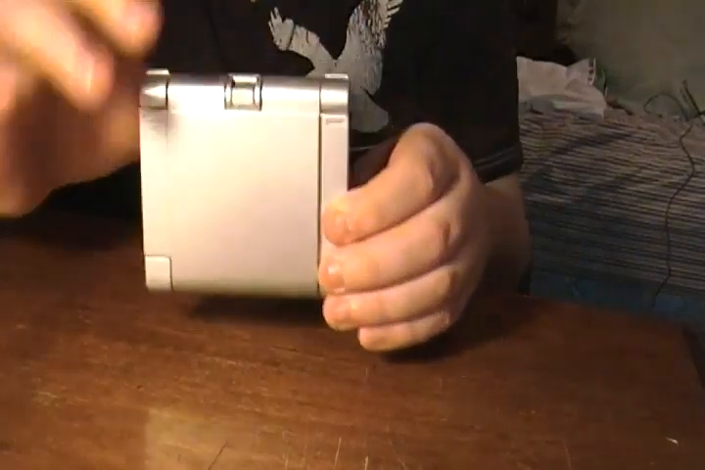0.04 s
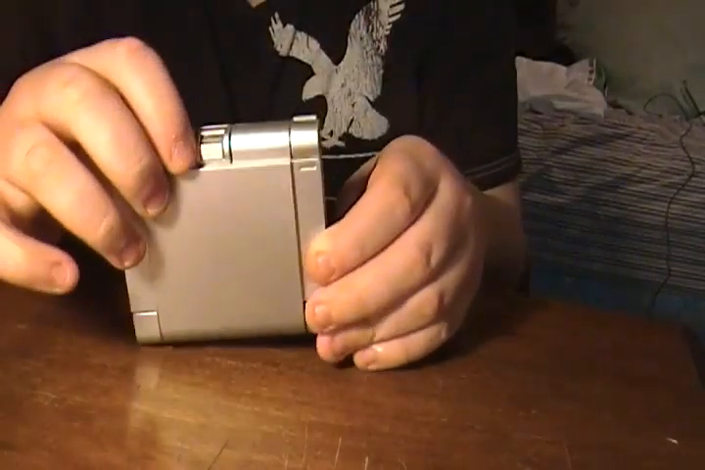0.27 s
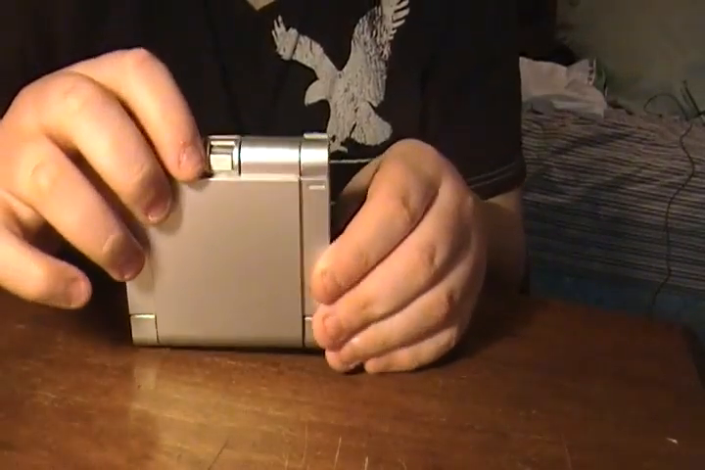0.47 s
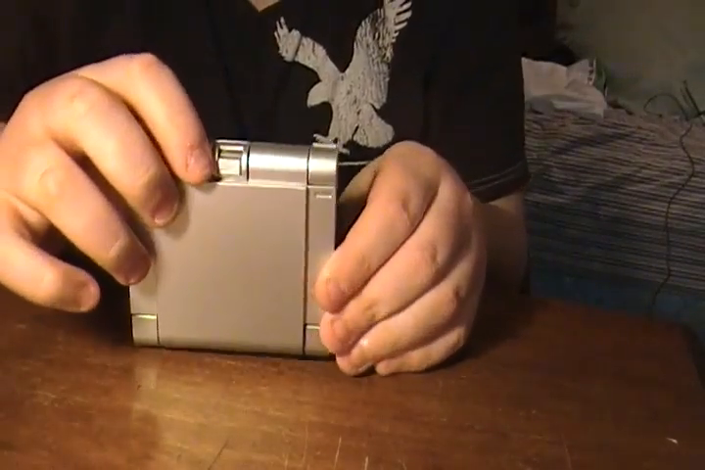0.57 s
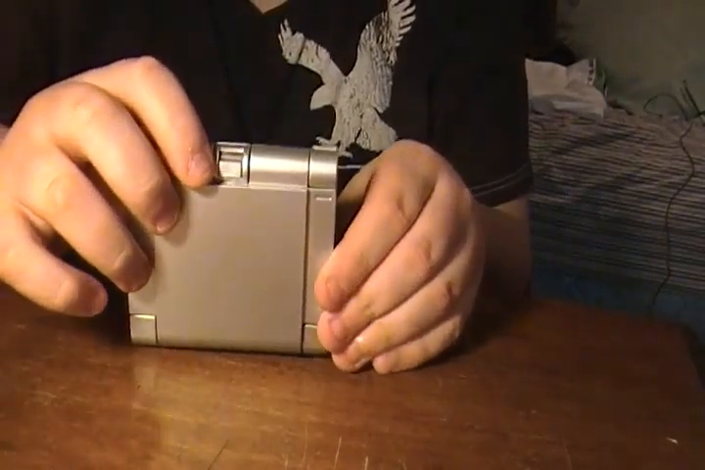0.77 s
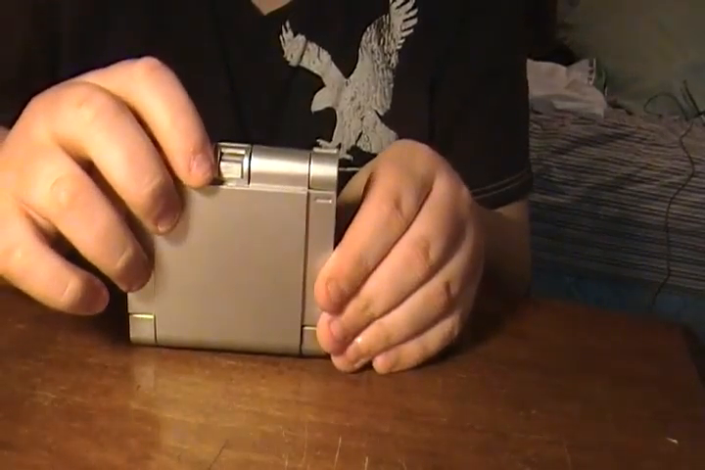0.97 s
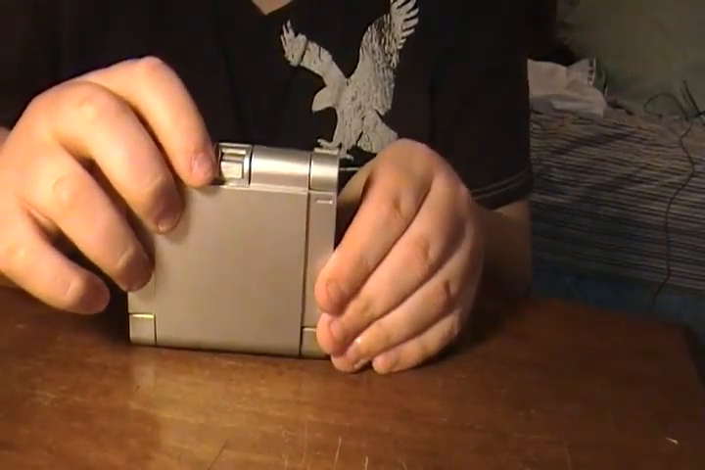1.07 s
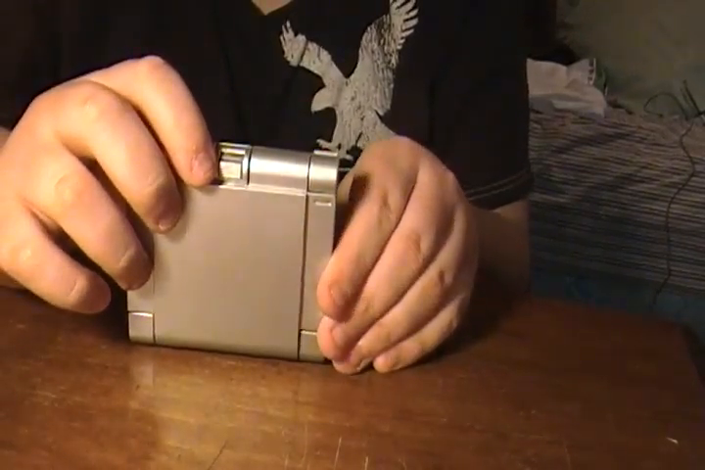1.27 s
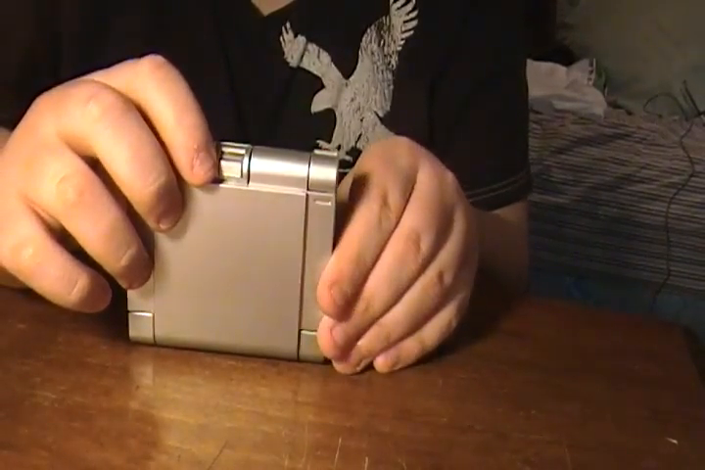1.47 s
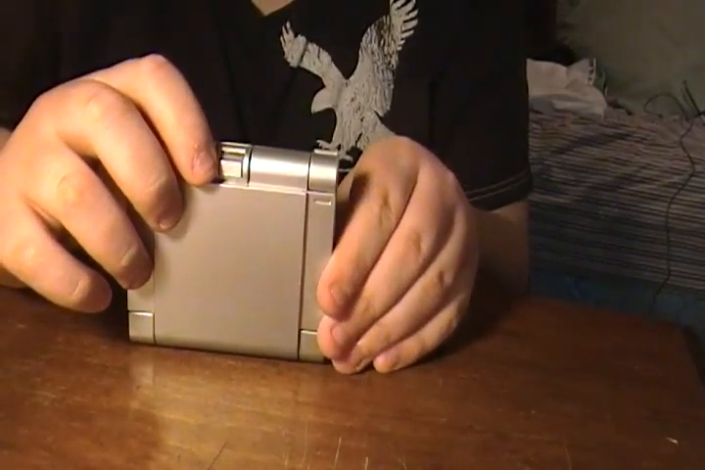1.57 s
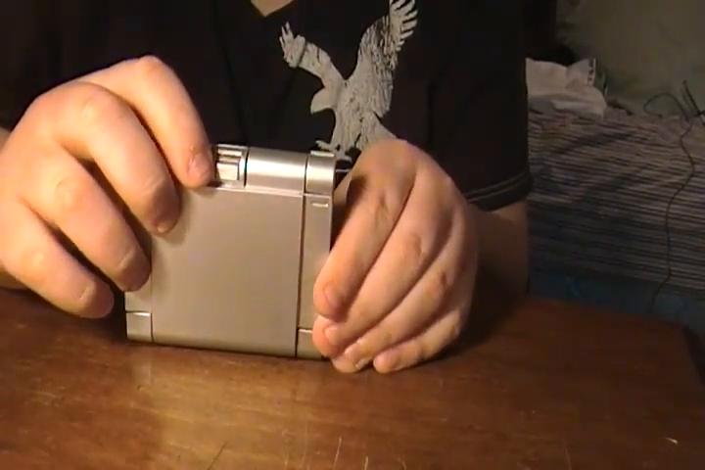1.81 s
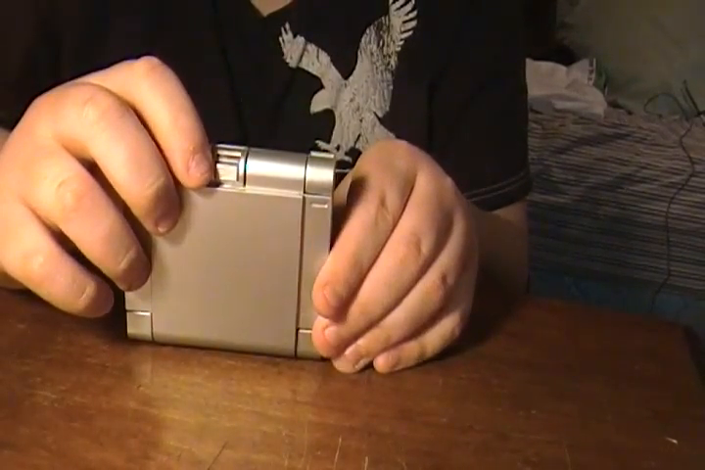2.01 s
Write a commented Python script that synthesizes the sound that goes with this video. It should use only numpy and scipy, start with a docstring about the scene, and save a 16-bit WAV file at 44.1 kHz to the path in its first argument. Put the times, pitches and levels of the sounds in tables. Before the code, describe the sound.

A small hinged device thuds twice on a wooden table. Fingers faintly brush its case until about 0.3 seconds. The first dull thud lands at 0.4 seconds, with a slight tick, brief wooden resonance and quick softer bumps as it settles. A second, softer thud follows at about 1.3 seconds. Faint electrical hum, thin camera motor whine, low rumble and hiss continue throughout in the small room.

```python
"""Fingers brush a small hinged device, then two dull thuds in a small room: it is stood on its edge
on a wooden table, and later rocked onto that edge again. Each blow rings the table top, with a faint
tick from the case and softer contacts as it settles. Behind it are mains hum, a camera's motor and
thin electronic whine, low room rumble and hiss."""
import sys
import numpy as np
from scipy import signal
from scipy.fft import rfft, irfft
from scipy.io import wavfile

SR = 44100
rng = np.random.default_rng(int(sys.argv[2]) if len(sys.argv) > 2 else 0)


def wav_out(sig):
    """Save sig, one row per channel (or a flat mono array), as 16-bit PCM at SR to the path in sys.argv[1]."""
    wavfile.write(sys.argv[1], SR, np.round(np.clip(np.atleast_2d(sig).T, -1, 1) * 32767).astype(np.int16))


N = 90404

# Case meets table. Each row: start in seconds, push in dB, push cut-off in Hz, tick in dB,
# tick cut-off in Hz.
CONTACTS = [(0.4121, 0.5, 755, -29, 3640), (0.4305, -6.5, 605, -35, 2000), (0.4433, -5.5, 408, -42, 1800),
            (0.484, -22.5, 380, -65, 1500), (0.508, -19, 327, -67, 1500), (1.2575, -3, 476, -32, 2030),
            (1.2775, -21, 400, -59, 1500)]
# Table top resonances. Each row: frequency in Hz, gain in dB, T60 in seconds.
TABLE_MODES = [(117.5, -19, .24), (125, -29.5, 0.28), (167.7, -25, .24), (213, -13.5, 0.11),
               (250.2, -26.5, 0.15), (280.3, -37.5, 0.51), (343.2, -24.5, 0.168), (356.3, -28, 0.12),
               (404.6, -33, 0.11), (486, -28, 0.19), (524, -25, 0.086), (568, -27, 0.064),
               (627, -66, 0.033), (732, -67, .08)]
# Case resonances. Each row: frequency in Hz, gain in dB, T60 in seconds.
CASE_MODES = [(958, -15, 0.098), (1378, -8, 0.031), (1562, -7, 0.021), (2084, -10, 0.038),
              (2950, -6.5, 0.013), (3310, -13.5, 0.026), (4100, -14, 0.018), (6600, 7, 0.025)]
# Finger strokes. Each row: peak time in seconds, length in seconds, level in dB, centre in Hz,
# width in octaves.
BRUSHES = [(0.032, 0.14, -49, 1300, 3.2), (0.025, 0.063, -57, 9500, 0.43), (0.084, 0.049, -55, 9750, .2),
           (0.188, 0.0082, -51, 3750, 0.44), (0.14, 0.37, -60, 3704, 1.9), (1.26, .012, -58, 9500, 0.54)]
# Mains hum and camera motor. Each row: frequency in Hz, rms level in dB, pan in dB,
# right phase lead in radians.
HUM_AND_MOTOR_TONES = [(60, -54, .5, 0), (120.2, -47.5, .8, -.15), (240, -51.5, .7, -.15),
                       (360.5, -64, 1.3, 0), (1074.6, -64.5, -1, .8), (1141.7, -50, 1.3, .8),
                       (1342, -72, 0, .3), (2283.3, -65, 2.6, 1.9), (2398, -74, 0, -1.5)]
# Room rumble. Each row: frequency in Hz, relative density in dB.
RUMBLE_SPECTRUM = [(15, -57), (25, -70.5), (38, -64.5), (58, -61), (88, -69), (135, -61.5), (200, -71),
                   (235, -68.5), (285, -79.5), (370, -76.5), (480, -78), (700, -84.5), (1200, -84.5),
                   (1900, -91), (2250, -90), (3000, -101), (8000, -110), (14000, -135)]
# Microphone hiss. Each row: frequency in Hz, relative density in dB.
HISS_SPECTRUM = [(15, -65), (40, -86), (140, -76.5), (260, -93), (400, -88.5), (1200, -87), (1900, -88),
                 (2300, -88), (2600, -93), (2950, -88.5), (3400, -92), (6000, -93), (10400, -93.5),
                 (12000, -104), (13400, -109), (14400, -122)]


def table_thuds(radiation_hz=172):
    """Each contact rings the table top; softer contacts are duller, and deep bass hardly radiates."""
    force = -sum(from_db(push_db) * low_pass(click(start_s), push_hz, order=4)
                 for start_s, push_db, push_hz, _, _ in CONTACTS)
    motion = ring(force, TABLE_MODES)
    return signal.sosfilt(signal.butter(2, radiation_hz, "high", fs=SR, output="sos"), motion)


def case_ticks(crack_db=-1.5, crack_t60_s=.025):
    """Each contact rings the case briefly, with a crack of contact noise; soft landings are duller."""
    force = crack = 0
    for start_s, _, _, tick_db, tick_hz in CONTACTS:
        force += from_db(tick_db) * low_pass(click(start_s), tick_hz, order=4)
        crack += from_db(tick_db) * low_pass(dying_noise(start_s, crack_t60_s), tick_hz)
    return ring(force, CASE_MODES) + from_db(crack_db) * crack


def finger_brushes():
    """Skin slides over the smooth case in soft, diffuse swells of friction noise."""
    time_s = np.arange(N) / SR
    out = 0
    for peak_s, length_s, level_db, centre_hz, width_oct in BRUSHES:
        band = np.exp(-2 * (np.log2(bins_hz() / centre_hz) / width_oct) ** 2)
        friction = unit_rms(irfft(rfft(rng.standard_normal((2, N))) * band, N))
        swell = np.exp(-2 * ((time_s - peak_s) / length_s) ** 2)
        out += from_db(level_db) * friction * swell
    return out


def room(direct, tail_db=-10, wall_cutoff_hz=3100, left_lag_s=.00005):
    """Direct sound plus a short dull tail off the walls; the table stands slightly to the right."""
    tail = low_pass(dying_noise(start_s=.014, t60_s=.19), wall_cutoff_hz)
    tail /= np.sqrt(np.sum(tail ** 2) * SR / (2 * wall_cutoff_hz))  # about unit passband gain
    right = direct + from_db(tail_db) * signal.fftconvolve(direct, tail)[:N]
    time_s = np.arange(N) / SR
    left = np.interp(time_s - left_lag_s, time_s, right)
    return np.array([left, right]) * pan(db=1.02)


def hum_and_motor(wobble_rms_hz=.39):
    """Mains hum and the camera's motor, each tone wavering slightly in pitch."""
    out = 0
    for hz, level_db, pan_db, lead_rad in HUM_AND_MOTOR_TONES:
        wobble = unit_rms(low_pass(rng.standard_normal(N + SR), cutoff_hz=9.85)[SR:])
        phase_rad = 2 * np.pi * np.cumsum(hz + wobble_rms_hz * wobble) / SR
        out += np.sqrt(2) * from_db(level_db) * pan(pan_db) * np.sin([phase_rad, phase_rad + lead_rad])
    return out


def electronic_whine(pitch_hz=7867, flips_per_s=30, level_db=-65.5):
    """The camera's thin, even tone, its polarity flipping at a regular rate."""
    time_s = np.arange(N) / SR
    polarity = low_pass(np.sign(np.sin(np.pi * flips_per_s * time_s)), cutoff_hz=300)
    tone = np.sqrt(2) * np.sin(2 * np.pi * pitch_hz * time_s)
    return from_db(level_db) * pan(db=2) * polarity * tone


def rumble_and_hiss():
    """Room rumble common to both sides; microphone hiss separate on each."""
    rumble = from_db(-.5) * steady_noise(RUMBLE_SPECTRUM) * pan(db=1.37)
    hiss = from_db(-1.5) * np.array([steady_noise(HISS_SPECTRUM) for _ in range(2)])
    return rumble + hiss


def ring(force, modes):
    """Sum of damped sines driven by the force."""
    out = 0
    for hz, gain_db, t60_s in modes:
        decay = np.exp(-np.log(1000) / (t60_s * SR))
        step_rad = 2 * np.pi * hz / SR
        feedback = [1, -2 * decay * np.cos(step_rad), decay * decay]
        out += from_db(gain_db) * signal.lfilter([0, np.sin(step_rad)], feedback, force)
    return out


def click(start_s):
    """Unit impulse."""
    out = np.full(N, 1e-18)
    out[int(start_s * SR)] = 1
    return out


def dying_noise(start_s, t60_s):
    """Noise with a sudden start and exponential decay."""
    age_s = np.arange(N) / SR - start_s
    return rng.standard_normal(N) * (age_s >= 0) * np.exp(-np.log(1000) * np.abs(age_s) / t60_s)


def steady_noise(spectrum):
    """Noise with the given spectral density."""
    hz, density_db = np.transpose(spectrum)
    gain = from_db(np.interp(np.log(bins_hz()), np.log(hz), density_db))
    return irfft(rfft(rng.standard_normal(N)) * gain, N) * np.sqrt(SR / 2)


def low_pass(x, cutoff_hz, order=2):
    """Butterworth low-pass."""
    return signal.sosfilt(signal.butter(order, cutoff_hz, fs=SR, output="sos"), x)


def bins_hz():
    """FFT frequencies, floored at 1 Hz."""
    return np.maximum(np.fft.rfftfreq(N, 1 / SR), 1)


def from_db(db):
    """Decibels to gain."""
    return 10 ** (np.asarray(db) / 20)


def unit_rms(x):
    """Scale to rms 1."""
    return x / np.sqrt(np.mean(x ** 2) + 1e-20)


def pan(db):
    """Left and right gains; positive leans right."""
    return from_db(np.array([[-db], [db]]))


def scene():
    """The handled device in the room, over the steady background."""
    background = rumble_and_hiss() + hum_and_motor() + electronic_whine()
    return background + finger_brushes() + room(table_thuds() + case_ticks())


def record(dry):
    """Steep treble cut."""
    cutoff_hz = 14200
    return signal.sosfilt(signal.ellip(10, .1, 80, cutoff_hz, fs=SR, output="sos"), dry)


dry = scene()
out = record(dry)
wav_out(out)
```